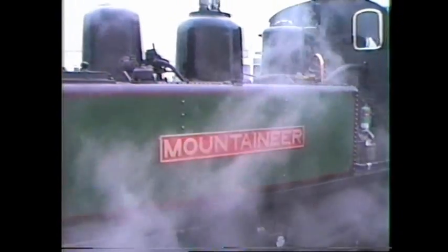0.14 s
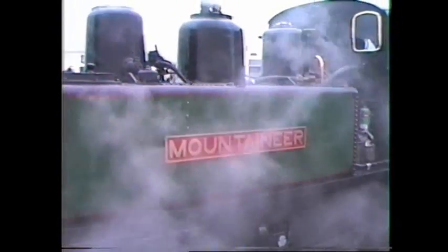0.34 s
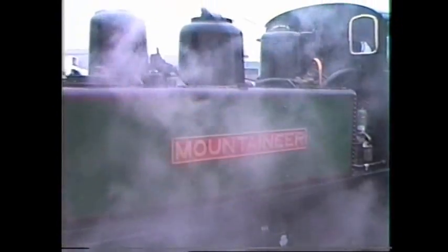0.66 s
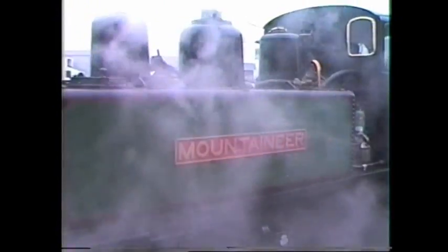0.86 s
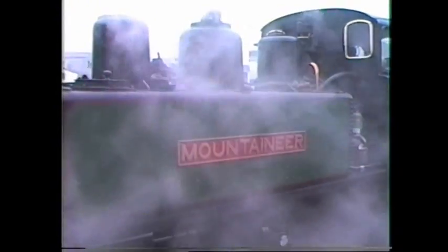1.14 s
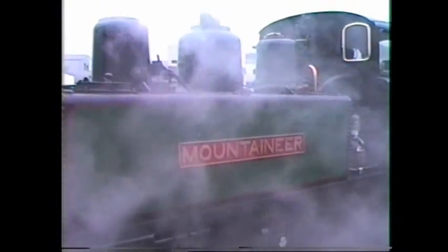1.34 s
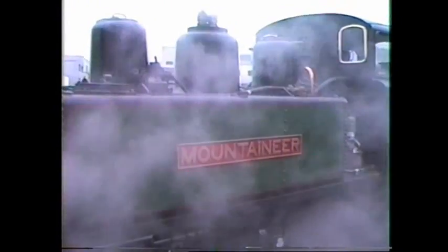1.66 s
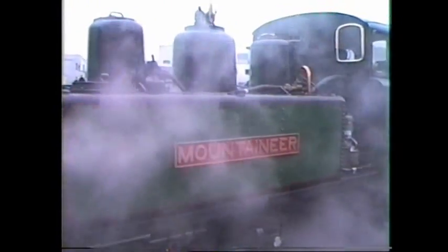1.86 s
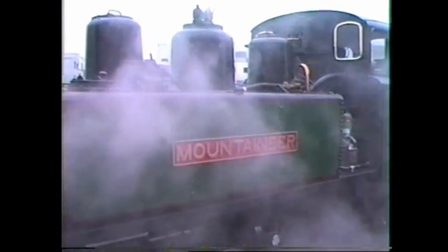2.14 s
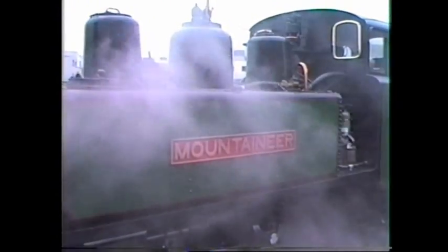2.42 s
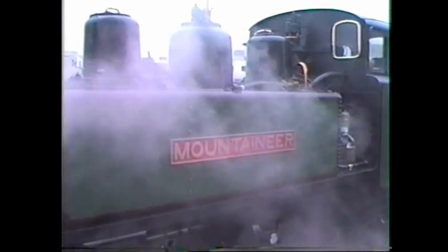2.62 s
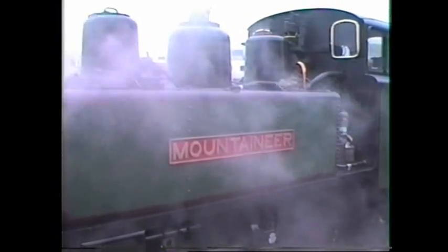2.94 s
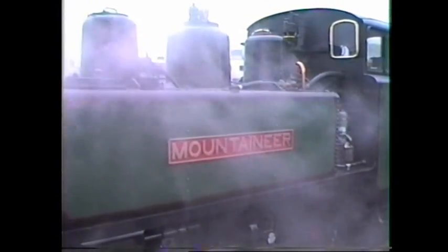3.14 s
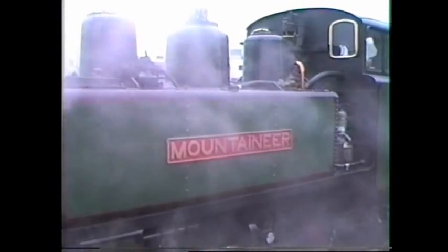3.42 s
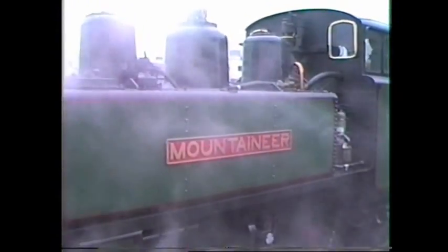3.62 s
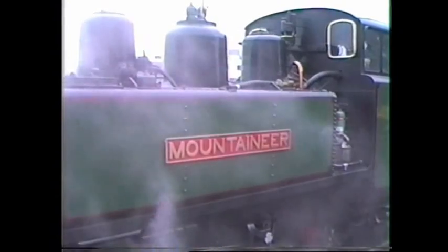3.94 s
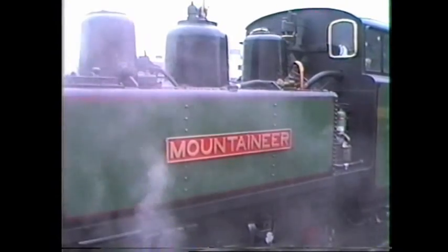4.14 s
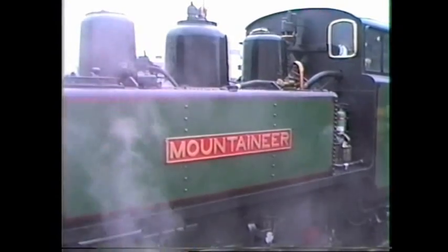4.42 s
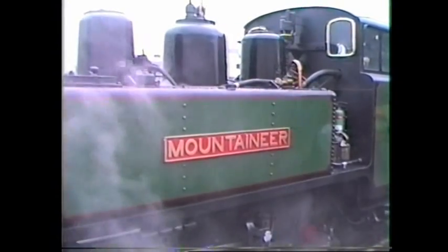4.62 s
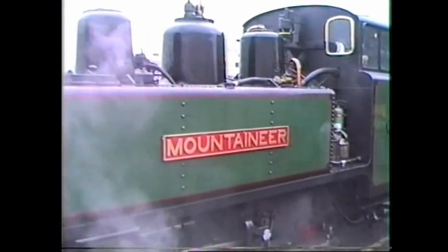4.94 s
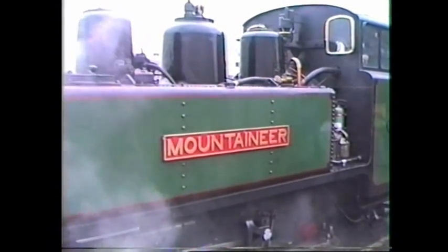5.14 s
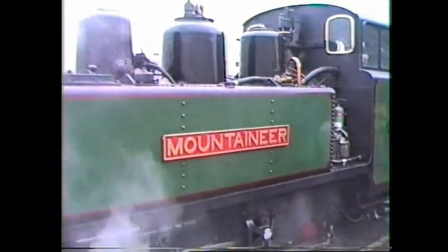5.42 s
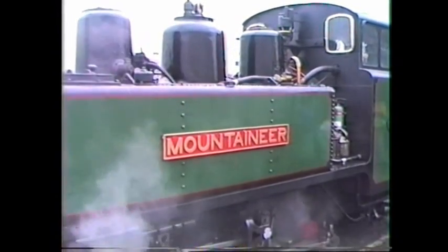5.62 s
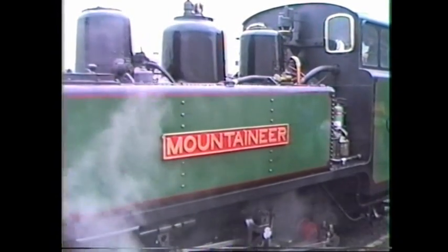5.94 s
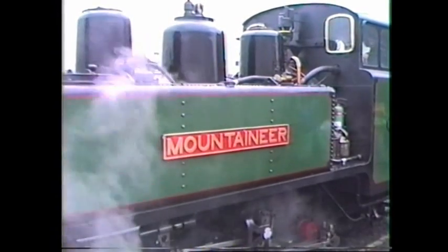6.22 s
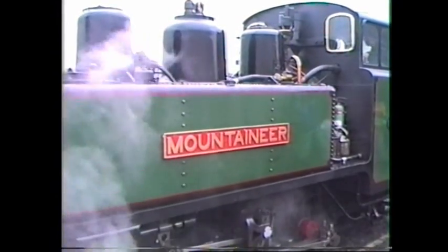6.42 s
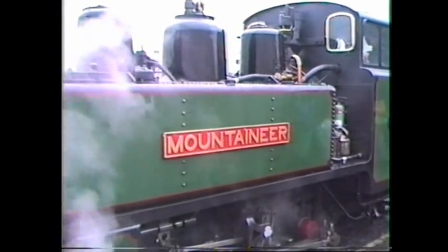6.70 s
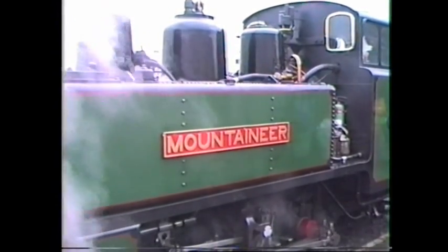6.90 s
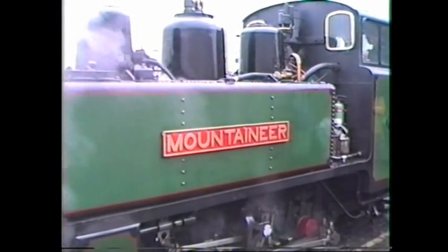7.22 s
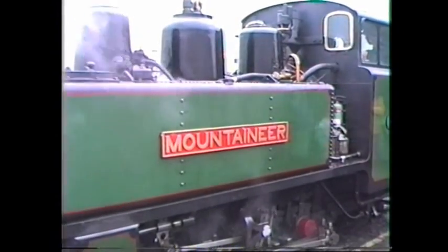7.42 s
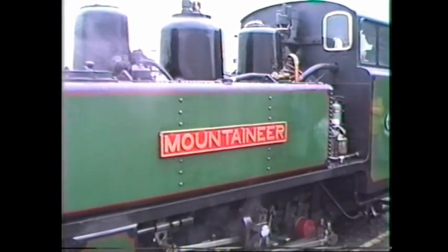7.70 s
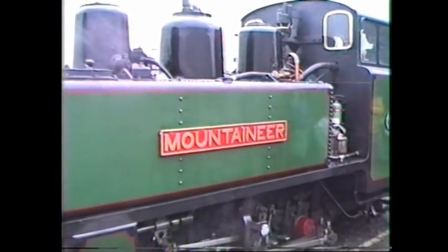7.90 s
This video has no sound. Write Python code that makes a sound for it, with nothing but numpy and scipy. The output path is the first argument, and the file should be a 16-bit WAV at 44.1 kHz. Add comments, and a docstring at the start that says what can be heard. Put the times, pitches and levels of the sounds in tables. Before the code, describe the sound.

Steam roars wet and hollow from a small standing locomotive, thins to a dry fine hiss, turns wet again, then abruptly drops away with a soft thump.

```python
"""A wet, hollow roar of steam comes first, from under a small standing locomotive, close beside its tank. It
thins to a drier, finer hiss and turns wet again; spaces under the frame colour it. At the very end the hiss
falls away sharply and a soft low thump swells. One microphone, alike in both channels. The jet is five bands of
noise with moving spectra; under it lie a quiet wash of noise and steady tones."""
import sys
import numpy as np
from scipy import signal
from scipy.io import wavfile
from scipy.ndimage import uniform_filter1d

SR = 44100
rng = np.random.default_rng(int(sys.argv[2]) if len(sys.argv) > 2 else 0)


def inscribe(sig):
    """Save sig as 16-bit PCM at rate SR to the path in sys.argv[1].

    A 1-D sig is mono; a 2-D sig holds one channel per row.
    Samples are clipped to [-1, 1] before scaling.
    """
    pcm = np.round(np.clip(np.atleast_2d(sig).T, -1, 1) * 32767)
    wavfile.write(sys.argv[1], SR, pcm.astype(np.int16))


N = 355446
FRAME, HOP = 2048, 256  # samples
HZ = np.fft.rfftfreq(FRAME, 1 / SR)
TIMES = np.arange(N // HOP + 5) * HOP / SR  # s, one per frame
SECONDS = np.arange(N) / SR  # s, one per sample

# smooth spectra of the five parts of the jet: pitch_hz, density_db (per Hz, relative)
ROAR_SPECTRUM = [(150, -30), (300, -24.5), (370, -12.5), (470, -21.5), (545, 0), (700, 0.5), (850, -3.5),
                 (1050, -9), (1600, -23.5), (4000, -51)]
RUSH_SPECTRUM = [(300, -42), (600, -15.5), (900, -13), (1200, -5.5), (1900, -2.5), (2450, -4), (2800, -2.5),
                 (3100, -2), (3500, -10), (5000, -21), (9000, -58)]
PIPE_SPECTRUM = [(1500, -22), (2600, -7), (3200, -9), (3480, -12), (3650, 0.5), (4500, -0.5), (5200, -2.5),
                 (5700, -4.5), (7000, -15), (9000, -55)]
HISS_SPECTRUM = [(3000, -32.5), (4500, -2), (5500, -9.5), (5900, 1.5), (6800, -2), (7150, -11.5),
                 (8000, -13.5), (9000, -26.5), (12000, -51)]
SPRAY_SPECTRUM = [(6000, -21.5), (7500, -2), (8500, 4.5), (9500, 1), (10000, 0), (10700, -1), (11400, -5),
                  (12100, -11), (13000, -21), (13700, -27)]
# level of each part before its rises and drops: dry_steam_db, wet_steam_db
ROAR_LEVELS = (-41.5, -31)
RUSH_LEVELS = (-26, -27)
PIPE_LEVELS = (-30, -25.5)
HISS_LEVELS = (-27.5, -34.5)
SPRAY_LEVELS = (-47, -47)

# how wet the steam is: time_s, wetness_share (0-1)
WETNESS_CURVE = [(0, 1), (.46, 0.88), (.56, 0.65), (.9, 0.24), (1.3, 0.18), (2.1, 0), (4.1, 0.1),
                 (4.3, 0.4), (4.55, 0.48), (4.85, 0.58), (4.93, 0.83), (6.7, 0.93), (8, 0.88)]
# resonances of the outlet, with wet and with dry steam: pitch_hz, width_hz, lift_db
WET_OUTLET = [(2880, 320, 6), (3830, 200, 6), (5086, 300, 7), (7840, 190, 8.5), (8600, 320, 4.5),
              (9500, 250, 3.5)]
DRY_OUTLET = [(2470, 220, 4.6), (3500, 210, 3.8), (3620, 190, 4.9), (4270, 290, 2.6), (4880, 180, 5.2),
              (5750, 160, 3.9), (5920, 130, 2.2), (6760, 170, 3.9), (7890, 100, 8.9)]
# resonances of the spaces between frame, wheels and ground: pitch_hz, width_hz, lift_db
FRAME_CAVITIES = [(352, 25, 2.5), (427, 27, 5.5), (589, 21, 1), (766, 47, 6), (849, 44, 10.5),
                  (991, 46, 4.5), (1023.4, 36.5, 10), (1147.5, 47, 9.5), (1207, 20, 7.5), (1325, 74, 4),
                  (1408, 67, 9.5), (1487, 54, 5), (1580, 90, 5), (1747, 100, 4.5), (1854, 115, 7.5),
                  (2011, 114, 9), (2255, 92, 6.5), (2380, 37, 5.5), (2400, 38, 4), (2597, 67, 6),
                  (2756, 23, 5.5)]
# peaks and dips of the open path from the jet, fading as the cloud spreads: pitch_hz, width_hz, lift_db
OPEN_AIR_PATH = [(790, 62, 4.5), (866, 39, -15), (1026, 59, -11), (1104, 70, 4.5), (1945, 81, 8),
                 (1996, 110, -6), (2530, 79, -6), (2745, 120, 5), (4270, 180, 4.5), (5270, 140, 1.5),
                 (7650, 220, -10), (8650, 430, -8)]
CLOUD_S = 0.77  # when the cloud has half spread

# slugs of water swell the hollow roar: start_s, length_s, rise_db
WATER_SLUGS = [(0, 0.1, 2), (4.89, .4, 1), (6.61, 0.12, 1.5)]
# the plume surges as the steam turns from wet to dry and back: start_s, length_s, rise_db
PLUME_SURGES = [(.5, 0.46, 2.5), (4.22, 0.44, 2)]
# the pressure at the outlet sags and the hiss sinks: start_s, length_s, drop_db
PRESSURE_LULLS = [(4.68, 0.43, 2.5), (6.38, 0.36, 1.5), (7.48, 0.1, 0.5)]
# short spits of fine spray: start_s, length_s, rise_db
SPRAY_SPITS = [(4.04, 0.19, 2), (6.8, .1, 1.5), (7.7, 0.12, 3)]
# how fast each kind sets in and ends
SLUG_EDGE_S, SURGE_EDGE_S, LULL_EDGE_S, SPIT_EDGE_S = 0.021, 0.073, 0.046, 0.025
# shares of the change in dB that these parts follow
PIPE_IN_SURGE, RUSH_IN_LULL, HISS_IN_SPIT = 0.35, 0.26, 0.9

BREAK_S, AFTER_DB = 8.037, -12  # when the hiss falls away sharply, and by how much
THUMP_HZ, THUMP_DB = 150, -25

# quiet background of the yard: pitch_hz, density_db (per Hz, relative)
YARD_SPECTRUM = [(15, -5), (25, 4), (36, 3), (70, 5.5), (110, 2.5), (170, -1), (205, 11), (260, -2.5),
                 (600, -10), (3000, 2.5), (9000, -33), (15500, -39)]
YARD_DB = -52  # rms level
# faint steady hum and whine: pitch_hz, level_db (rms)
HUM_TONES = [(25, -66), (50, -65), (15625, -89)]
EDGE_HZ = 15750  # upper limit of the recorder


def steam():
    """Five parts of one jet, coloured by the same outlet, cavities and echoes."""
    wet = np.clip(np.interp(TIMES, *np.transpose(WETNESS_CURVE)), 0, 1)
    roar_db, rush_db, pipe_db, hiss_db, spray_db = jet_levels(wet)

    # the outlet rings differently as more or less water comes with the steam
    outlet = np.outer(wet, lift(WET_OUTLET)) + np.outer(1 - wet, lift(DRY_OUTLET))
    clear = 0.5 - 0.5 * np.tanh((TIMES[:, None] - CLOUD_S) / 0.39)
    # echoes off ground and tank cut fine ripples into the spectrum, which drift with the plume
    ripples = 1.93 * patches(life_s=0.4, span_hz=32)
    colour = outlet + lift(FRAME_CAVITIES) + clear * lift(OPEN_AIR_PATH) + ripples

    roar = turbulence(read(ROAR_SPECTRUM) + colour, roar_db, eddy_db=1.4, flutter_db=0.02, waver_db=0.14)
    rush = turbulence(read(RUSH_SPECTRUM) + colour, rush_db, eddy_db=0.5, flutter_db=0.06, waver_db=0.02)
    pipe = turbulence(read(PIPE_SPECTRUM) + colour, pipe_db, eddy_db=0.5, flutter_db=0.4, waver_db=0.55)
    hiss = turbulence(read(HISS_SPECTRUM) + colour, hiss_db, eddy_db=0.35, flutter_db=0.55, waver_db=0.7)
    spray = turbulence(read(SPRAY_SPECTRUM) + colour, spray_db, eddy_db=1.0, flutter_db=1.0, waver_db=0.3)
    return roar + rush + pipe + hiss + spray


def jet_levels(wet):
    """Water feeds roar and pipe mouth and starves the dry hiss; slugs, surges, lulls and spits ride on top."""
    parts = (ROAR_LEVELS, RUSH_LEVELS, PIPE_LEVELS, HISS_LEVELS, SPRAY_LEVELS)
    roar, rush, pipe, hiss, spray = (np.interp(wet, (0, 1), ends) for ends in parts)
    slug = swells(WATER_SLUGS, SLUG_EDGE_S)
    surge = swells(PLUME_SURGES, SURGE_EDGE_S)
    lull = swells(PRESSURE_LULLS, LULL_EDGE_S)
    spit = swells(SPRAY_SPITS, SPIT_EDGE_S)
    return (roar + slug,
            rush + surge - RUSH_IN_LULL * lull,
            pipe + PIPE_IN_SURGE * surge - lull,
            hiss - lull + HISS_IN_SPIT * spit,
            spray + spit)


def swells(events, edge_s):
    """A change in dB over time: each event sets in, holds and lets go."""
    total = 0
    for start, length, db in events:
        set_in = np.tanh((TIMES - start) / edge_s)
        let_go = np.tanh((TIMES - start - length) / edge_s)
        total = total + db * (set_in - let_go) / 2
    return total


def turbulence(colour_db, level_db, eddy_db, flutter_db, waver_db):
    """One part of the jet: eddies stir patches of its spectrum; the whole flow flutters and slowly wavers."""
    eddies = eddy_db * patches(life_s=0.026, span_hz=500)
    quick, slow = rng.standard_normal((2, len(TIMES)))
    flutter = flutter_db * evened(uniform_filter1d(quick, size=7))  # size in frames
    waver = waver_db * evened(uniform_filter1d(slow, size=30))
    moving_db = np.interp(SECONDS, TIMES, level_db + flutter + waver)
    return amp(moving_db) * noise(colour_db + eddies)


def thump(rise_s):
    """A soft low thump: a sine that swells from the break, peaks after rise_s and starts to die."""
    t = np.maximum(SECONDS - BREAK_S, 0)
    swell = (t / rise_s) ** 2 * np.exp(1 - (t / rise_s) ** 2)
    return amp(THUMP_DB) * swell * np.sin(2 * np.pi * THUMP_HZ * t)


def background():
    """The background: an even wash of noise from the yard, with a faint hum and whine of steady sines."""
    hum = sum(amp(db) * np.sqrt(2) * np.sin(2 * np.pi * hz * SECONDS) for hz, db in HUM_TONES)
    return amp(YARD_DB) * noise(read(YARD_SPECTRUM)) + hum


def noise(field_db):
    """Noise of rms 1 whose short-time spectrum follows a field in dB."""
    real, imag = rng.standard_normal((2, len(TIMES), len(HZ)))
    spectra = (real + 1j * imag) * amp(field_db)
    _, sound = signal.istft(spectra.T, nperseg=FRAME, noverlap=FRAME - HOP)
    return evened(sound[:N])


def patches(life_s, span_hz):
    """Smooth chance over time and frequency, rms 1."""
    field = rng.standard_normal((len(TIMES), len(HZ)))
    over_time = np.fft.fftfreq(len(TIMES), HOP / SR)[:, None] * life_s
    over_hz = np.fft.rfftfreq(len(HZ), HZ[1]) * span_hz
    smoothing = np.exp(-2 * (over_time ** 2 + over_hz ** 2))
    return evened(np.fft.irfft2(np.fft.rfft2(field) * smoothing, field.shape))


def read(points):
    """A spectrum in dB, joined by straight lines over log frequency."""
    hz, db = np.transpose(points)
    return np.interp(np.log(HZ + 1), np.log(hz + 1), db)


def lift(modes):
    """The bell-shaped rise or dip in dB around each resonance, at half its lift across its width."""
    return sum(db * 2 ** -(2 * (HZ - hz) / width) ** 2 for hz, width, db in modes)


def amp(db):
    """Decibels to gain."""
    return 10 ** (np.asarray(db) / 20)


def evened(x):
    """Scales to rms 1."""
    return x / np.sqrt(np.mean(x ** 2) + 1e-20)


def scene():
    """The steam, falling away sharply at the break, with the thump, over the background; both channels alike."""
    gate = np.where(SECONDS < BREAK_S, 1, amp(AFTER_DB))
    sounding = uniform_filter1d(gate, size=200)  # size in samples
    mono = sounding * steam() + background() + thump(rise_s=0.014)
    return np.array([mono, mono])


def record(dry):
    """The band limit of the recorder: a steep low-pass."""
    low_pass = signal.firwin(1023, EDGE_HZ, window=("kaiser", 9), fs=SR)
    return signal.oaconvolve(dry, low_pass[None], "same", axes=1)


dry = scene()
out = record(dry)
inscribe(out)
```